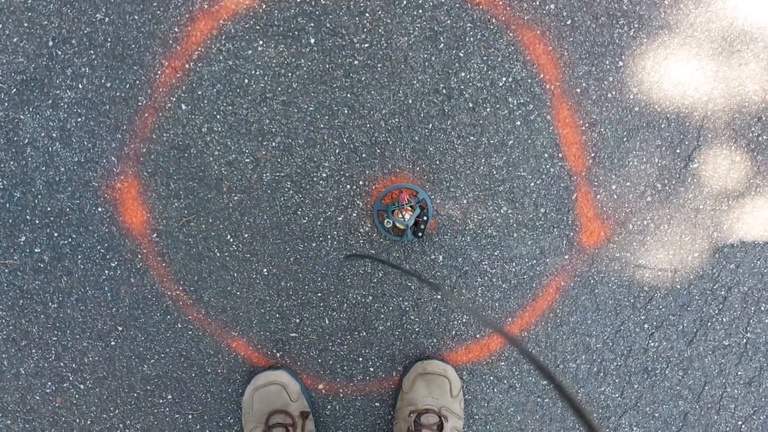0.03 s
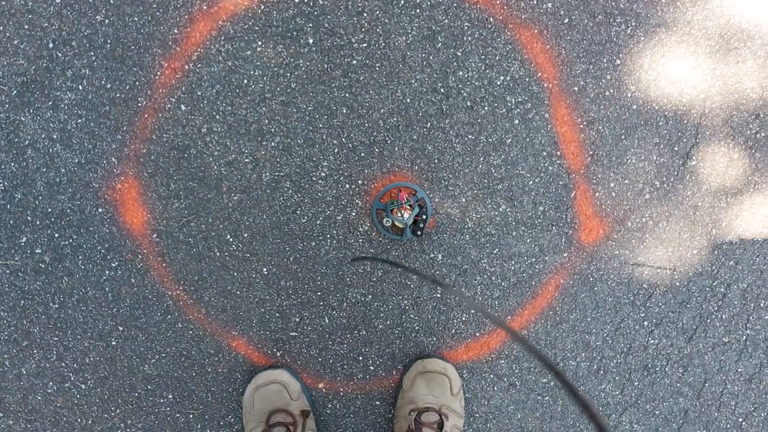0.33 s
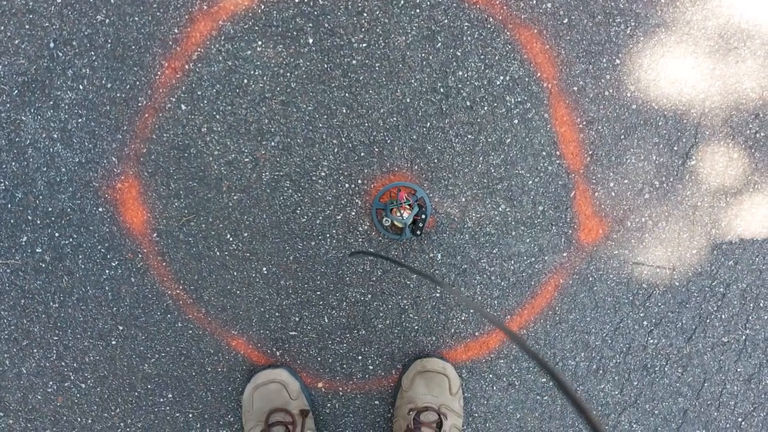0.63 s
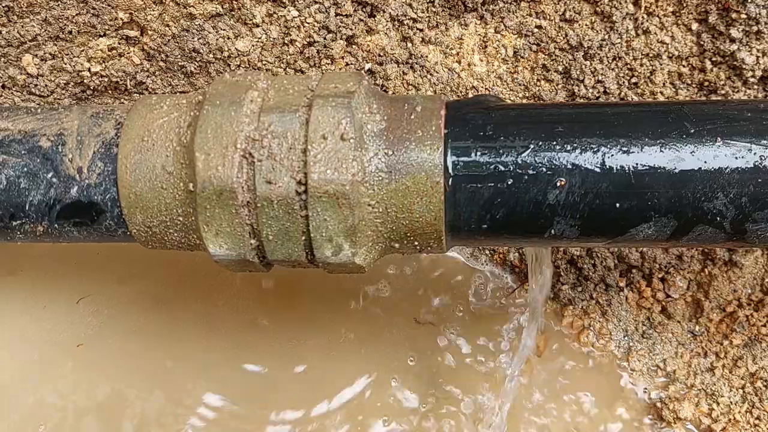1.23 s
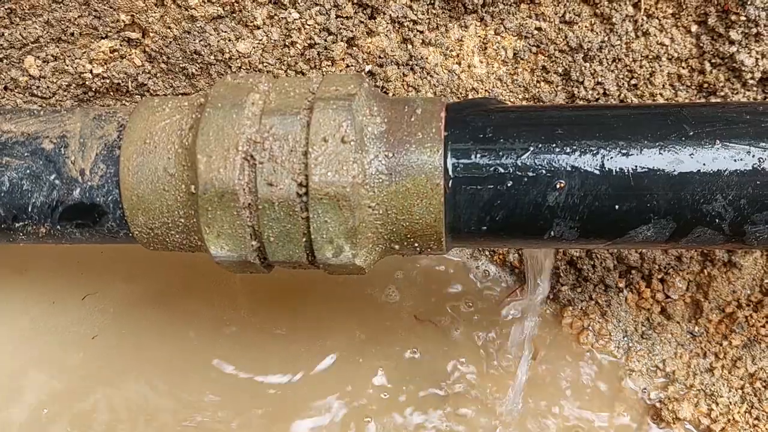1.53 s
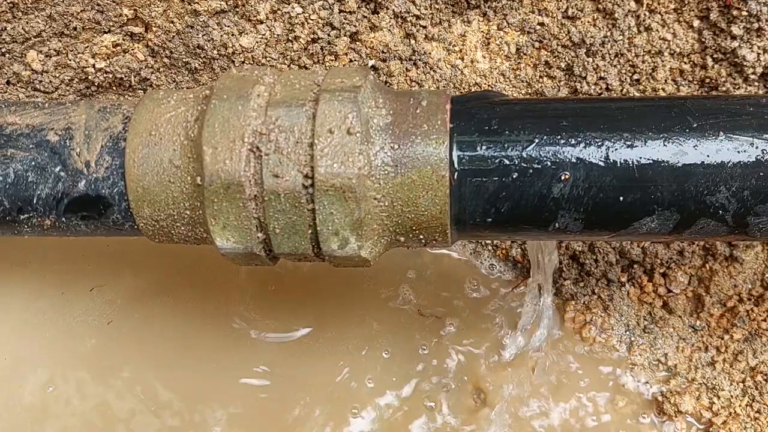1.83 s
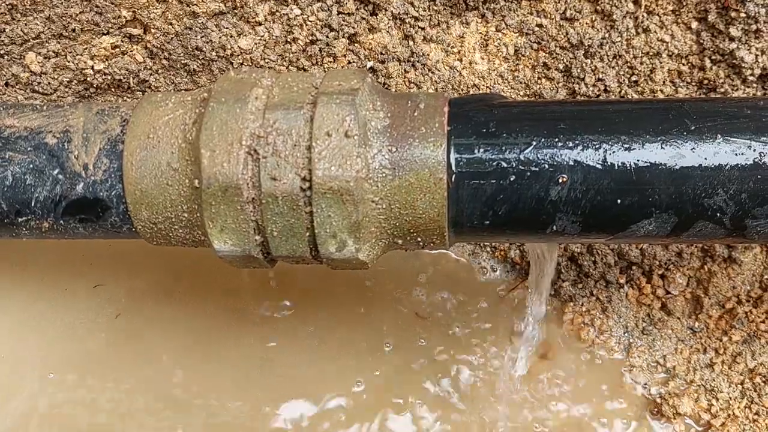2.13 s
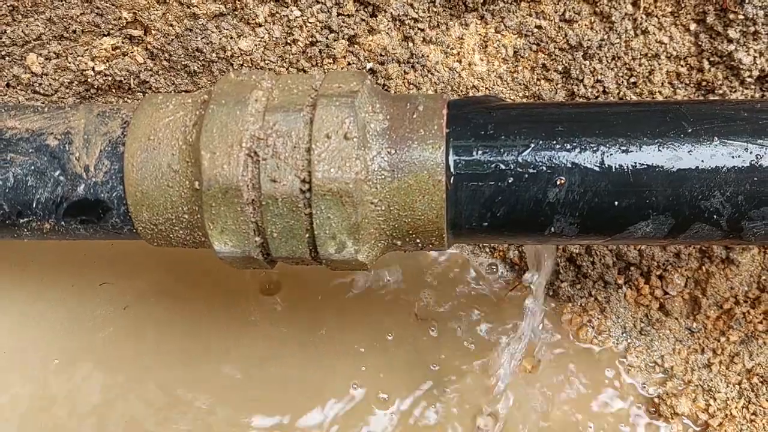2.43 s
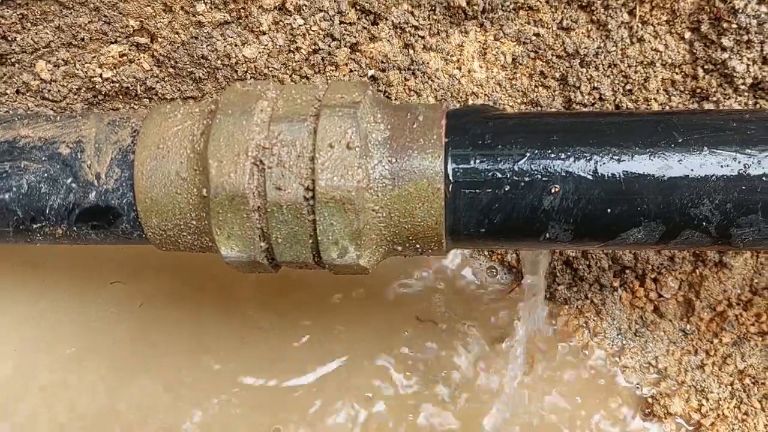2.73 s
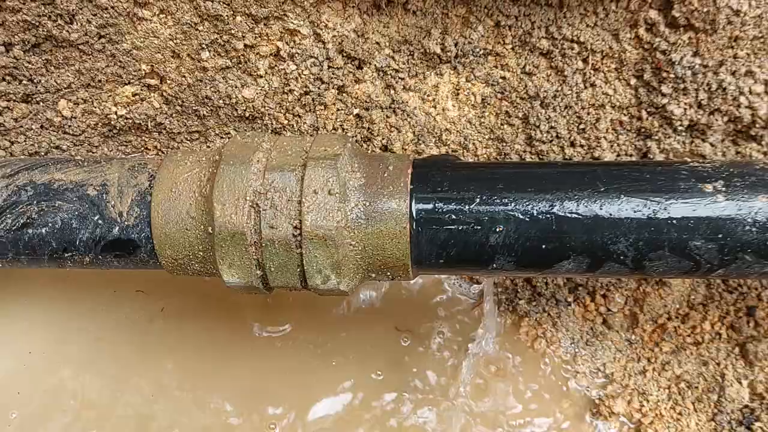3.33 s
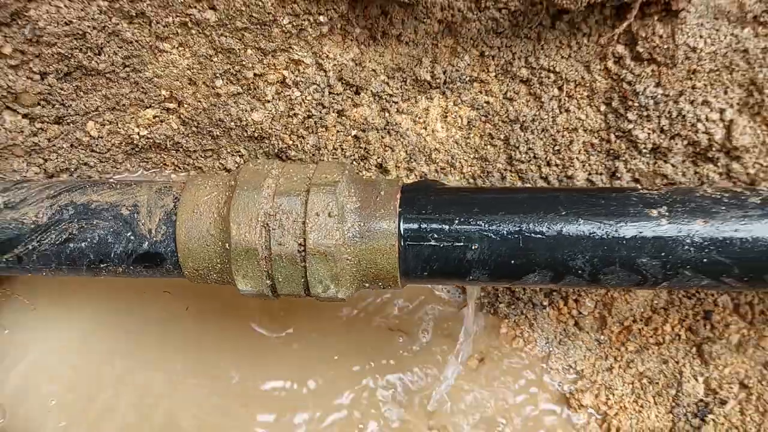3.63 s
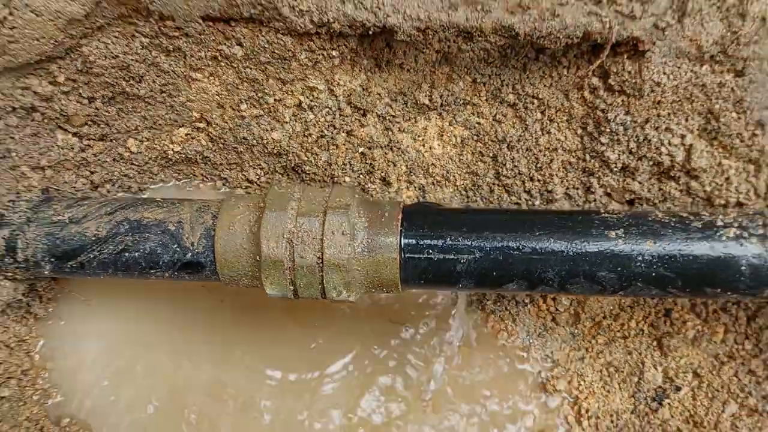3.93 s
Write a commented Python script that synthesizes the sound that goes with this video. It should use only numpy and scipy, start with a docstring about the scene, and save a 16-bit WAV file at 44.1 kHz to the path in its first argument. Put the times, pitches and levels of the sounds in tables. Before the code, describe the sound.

A hollow rush through the ground stops, then leaking water trickles into a puddle.

```python
"""First, a ground microphone on asphalt picks up a buried leak: a hollow rush, ringing near 600 Hz.
Two soft bumps push the sensor, and at 1.2 s the sound stops abruptly.
After a blink of silence, a thin stream falls from a pipe fitting into a muddy pit, close up.
Fine spray fizzes and makes the pit ring, small bubbles swarm, and a faint rumble lies underneath.
Over this, to the end, droplets tick on wet surfaces, tiny bubbles pip and large trapped bubbles plop."""
import sys
import numpy as np
from scipy import signal
from scipy.io import wavfile
from scipy.ndimage import uniform_filter1d

SR = 44100
rng = np.random.default_rng(int(sys.argv[2]) if len(sys.argv) > 2 else 0)


def digitize_waveform(pressure):
    """Quantize a signal to 16-bit integers and store it at the path in sys.argv[1].

    Rows of a 2-D input are taken as channels; values are limited to [-1, 1].
    """
    field = np.atleast_2d(pressure).T
    bounded = np.clip(field, -1, 1)
    quanta = np.round(bounded * 32767).astype(np.int16)
    wavfile.write(sys.argv[1], SR, quanta)


N = 176400
TIME = np.arange(N) / SR
BRIEF = TIME[:3500]  # the clock for one short sound, about 0.08 s
GROUND_END_S, PIT_START_S, CUTOFF_HZ = 1.203, 1.233, 16000


def from_db(db):
    """Turn decibels into a number to multiply a sound by."""
    return 10 ** (np.asarray(db) / 20)


def rms_one(x):
    """Scale a sound so that its average strength (rms) is 1."""
    return x / np.sqrt(np.mean(x ** 2) + 1e-20)


def butter(x, hz, kind, order=2):
    """Keep the lows, the highs or one band of a sound."""
    sections = signal.butter(order, np.minimum(hz, SR / 2 - 10), kind, fs=SR, output="sos")
    return signal.sosfilt(sections, x)


def add(out, s, sound):
    """Mix a short sound in at s seconds."""
    i = int(np.clip(s * SR, 0, N - 1))
    out[i:i + len(sound)] += sound[:N - i]


def delayed(x, s):
    """The same sound, s seconds later."""
    return np.interp(TIME[:len(x)] - s, TIME[:len(x)], x, left=0)


def fade(ring_s):
    """A fade that falls 60 dB in ring_s seconds."""
    return from_db(-60 * BRIEF / ring_s)


def drift(hz):
    """A random wander of about 1 either way; more hz makes it quicker."""
    slow = butter(rng.standard_normal(N // 20 + 4000), hz * 20, "low")[4000:]
    return np.interp(np.arange(N) / 20, np.arange(len(slow)), rms_one(slow))


def shaped_noise(spectrum, flicker_db, count=4):
    """Noise built from narrow bands that can flicker, partly together."""
    hz, db = np.transpose(spectrum)
    edges = 20 * 2 ** (np.arange(31) / 3)  # three bands per octave
    white = rng.standard_normal((2, N + SR // 2))
    together = drift(hz=47.3)
    flickers = [from_db(flicker_db * (together + drift(hz=45.3)) / np.sqrt(2)) for _ in range(count)]
    out = np.zeros(N)
    for k, (low, high) in enumerate(zip(edges, edges[1:])):
        gain = from_db(np.interp(np.log(low * high) / 2, np.log(hz), db))
        band = butter(white[k % 2], [low, high], "band", order=3)[-N:]
        out += gain * flickers[k % count] * band
    return rms_one(out)


def rung_noise(tones):
    """Churning noise that rings around a few pitches."""
    out = np.zeros(N)
    for hz, width, db in tones:
        band = butter(rng.standard_normal(N + SR), [hz - width / 2, hz + width / 2], "band")[-N:]
        out += from_db(db) * rms_one(band)
    return out


def burst(band_hz):
    """A short puff of noise between two frequencies."""
    return rms_one(butter(rng.standard_normal(len(BRIEF)), band_hz, "band"))


def bubble(hz, ring_s, rise_per_s, attack_s=0.00033):
    """A bubble rings and fades, its pitch rising as it nears the surface."""
    pitch = np.minimum(hz * (1 + rise_per_s * BRIEF), SR / 2)
    onset = 1 - np.exp(-BRIEF / attack_s)
    return onset * fade(ring_s) * np.sin(2 * np.pi * np.cumsum(pitch) / SR)


# Where the leak rings through the ground: (pitch [Hz], width [Hz], relative level [dB])
LEAK_TONES = [(606, 36.3, -37), (663.6, 75, -39.5), (772.6, 40, -48), (906, 170, -49)]
# Moments when the ringing noise happens to grow briefly louder: (time [s])
RINGING_SWELLS = [.097, 0.222, .283, 0.341, 0.466, .795, 0.976, 1.09, 1.189]
# The broad rush under the ringing: (frequency [Hz], relative level [dB])
LEAK_RUSH = [(60, -1), (200, -13.5), (1100, -21.5), (1700, -27.5), (2700, -27.5), (3600, -33.5),
             (5200, -36), (8200, -32.5), (12000, -39.5), (16000, -41.5)]


def ground_leak():
    """The ground carries the leak's steady rush; its ringing noise is briefly louder now and then."""
    ringing = rung_noise(LEAK_TONES)
    even = ringing / np.sqrt(uniform_filter1d(ringing ** 2, int(0.055 * SR)))
    swells = sum(np.exp(-((TIME - s) / 0.011) ** 2) for s in RINGING_SWELLS)
    rush = from_db(-37) * shaped_noise(LEAK_RUSH, flicker_db=0)
    sensor_offset = 0.11  # shifts the whole wave off zero
    return even * from_db(-35 + 5 * swells) + rush + sensor_offset


# Bumps on the ground microphone: (time [s], length [s], push level [dB])
SENSOR_BUMPS = [(0.277, 0.0236, -13), (1.029, 0.0234, -12.5)]


def bumps():
    """Each bump pushes the sensor over and lets it go: a dull, sagging pulse."""
    push = sum(from_db(db) * ((TIME > s) & (TIME < s + length)) for s, length, db in SENSOR_BUMPS)
    sagging = butter(push, 8.5, "high", order=1)
    return butter(sagging, 156, "low")


# The tone of the fine spray: (frequency [Hz], relative level [dB])
FIZZ_SHAPE = [(400, -8), (600, -27), (900, -5.5), (2600, 1.5), (3100, -6.5), (3650, -4.5), (5200, 2.5),
              (7300, 3), (8400, -11.5), (9700, -3.5), (12200, -2.5), (16000, -4.5)]
# How loud the spray is: (time [s], level [dB])
FIZZ_LOUDNESS = [(1.6, -48.5), (3.1, -49), (3.6, -51)]


def spray_fizz():
    """Fine spray makes a flickering hiss."""
    level_db = np.interp(TIME, *np.transpose(FIZZ_LOUDNESS))
    return from_db(level_db) * shaped_noise(FIZZ_SHAPE, flicker_db=3.5)


# Where the pit rings: (pitch [Hz], width [Hz], level [dB])
PIT_TONES = [(2560, 810, -63.5), (4000, 120, -66.5), (4400, 230, -61.5), (6020, 1000, -62),
             (7110, 630, -60), (8560, 440, -62)]


def pit_ringing():
    """The spray keeps the hollow of the pit ringing faintly."""
    return rung_noise(PIT_TONES)


def pit_echo(x, slap_s=0.00202):
    """Add one slap from the water surface or pipe close by, then a faint, very short tail."""
    tail = rng.standard_normal(len(BRIEF)) * fade(ring_s=0.041) * (BRIEF > slap_s)
    echoes = signal.fftconvolve(x, tail / np.linalg.norm(tail))[:N]
    return x + from_db(-27) * delayed(x, slap_s) + from_db(-8.5) * echoes


# Swarms of faint bubbles: (rate [per s], lowest pitch [Hz], highest pitch [Hz],
# ring length [cycles], lowest level [dB], typical extra level [dB])
BUBBLE_SWARMS = [(75, 1157, 3270, 28, -46, 2.5), (219.4, 3720, 9650, 23, -47.5, 4.5),
                 (108.7, 4200, 31000, 9.5, -40.5, 4.5)]
SMALL_RISE_PER_S = 26  # small bubbles glide up fast: share of their pitch per second


def swarms():
    """Small bubbles burst at random, mostly faint, now and then stronger."""
    out = np.zeros(N)
    for per_s, low_hz, high_hz, cycles, db, extra_db in BUBBLE_SWARMS:
        draws = rng.random((3000, 4))
        gaps_s = -np.log(draws[:, 0]) / per_s
        starts = PIT_START_S + np.cumsum(gaps_s)
        for s, (_, pitch, size, rise) in zip(starts[starts < N / SR], draws):
            hz = low_hz * (high_hz / low_hz) ** pitch
            strength = from_db(db + extra_db * min(-np.log(size), 4))
            ring = bubble(hz, cycles / hz, 2 * rise * SMALL_RISE_PER_S, attack_s=0.5 / hz)
            add(out, s, strength * ring)
    return out


# The tone of the distant rumble: (frequency [Hz], relative level [dB])
RUMBLE_SHAPE = [(45, -15.5), (65, 4), (90, -9), (140, -15), (200, -30), (300, -17), (400, -31.5),
                (700, -26.5), (2000, -87)]
# Its low drone: (pitch [Hz], width [Hz], base level [dB])
DRONE_TONES = [(61.95, 5.8, -59.5)]
# How the drone swells and sinks: (time [s], level change [dB])
DRONE_CHANGES = [(1.3, -6), (1.68, 13), (1.82, -7), (2.0, 18), (2.1, 3), (2.53, 11.5), (3.2, -26),
                 (3.92, 12.5)]


def distant_rumble():
    """A faint, flickering rumble with a low drone that comes and goes."""
    rumble = from_db(-54.5) * shaped_noise(RUMBLE_SHAPE, flicker_db=3)
    swell_db = np.interp(TIME, *np.transpose(DRONE_CHANGES))
    return rumble + from_db(swell_db) * rung_noise(DRONE_TONES)


# Droplets landing: (time [s], relative level [dB])
DROPLET_TICKS = [(1.257, -26), (1.5212, -29), (2.366, -34), (3.392, -34), (1.4897, -31), (1.5315, -26),
                 (1.8061, -28.5), (1.9256, -26), (2.1633, -29.5), (2.187, -29), (2.2821, -19), (2.381, -37),
                 (2.544, -31), (2.7798, -26.5), (3.2016, -26.5), (3.3146, -27.5), (3.591, -28),
                 (3.7409, -23.5)]


def ticks():
    """Droplets smack on wet surfaces, each a bright snap of noise."""
    out = np.zeros(N)
    for s, db in DROPLET_TICKS:
        smack = burst([5300, 7300])
        crack = from_db(4) * burst([5300, CUTOFF_HZ])
        add(out, s, from_db(db - 9.5) * (smack + crack) * fade(ring_s=0.011))
    return out


def splash(low_hz, high_hz, fade_s):
    """A quickly fading spit of spray that goes with a bubble."""
    return burst([low_hz, high_hz]) * np.exp(-BRIEF / fade_s)


# Tiny bubbles from single drops: (time [s], relative level [dB], pitch [Hz])
TINY_BUBBLES = [(1.2573, -29, 5270), (1.558, -28.5, 5130), (1.739, -22.5, 4600), (1.8641, -23, 4580),
                (2.002, -27, 4430.0), (2.104, -23.5, 4200), (2.18, -27, 6700), (2.553, -29, 7460),
                (2.6408, -24, 4030), (2.8363, -25, 4820), (2.963, -24.5, 4660), (3.1984, -21.5, 5060),
                (3.2417, -25.5, 4440), (3.294, -23, 4030), (3.3938, -25.5, 5430), (3.7415, -23, 4370),
                (3.7762, -24.5, 5140)]


def pips():
    """A single drop makes a tiny, high-pitched bubble and a little spray."""
    out = np.zeros(N)
    for s, db, hz in TINY_BUBBLES:
        ring = bubble(hz, ring_s=0.011, rise_per_s=10)
        spray = from_db(-16.5) * splash(0.23 * hz, 1.64 * hz, fade_s=0.0045)
        add(out, s, from_db(db - 0.5) * (ring + spray))
    return out


# Large bubbles: (time [s], relative level [dB], pitch [Hz], time to fade by 60 dB [s])
LARGE_BUBBLES = [(1.3353,-27,1550,0.011), (1.362,-22,1460,0.022), (1.363,-32,1990,0.035),
                 (1.378,-33.5,655,0.014), (1.3805,-32.5,365,0.01), (1.4024,-27.5,980,0.0069),
                 (1.427,-28.5,840,0.0096), (1.4902,-26.5,2670,0.013), (1.499,-23,1110,0.0092),
                 (1.5653,-26,1850,0.024), (1.588,-34.5,917,0.03), (1.727,-38.5,957,0.052),
                 (1.739,-33,1900,0.034), (1.865,-29.5,1930,0.026), (1.917,-33.5,2460,0.04),
                 (1.925,-38,1464,0.033), (2.0002,-35,2480,0.04), (2.0965,-35.5,646,0.077),
                 (2.11,-31,1640,0.024), (2.1513,-32,2530,0.038), (2.325,-30.5,2860,0.013),
                 (2.369,-34,1970,0.029), (2.381,-19.5,1420,0.016), (2.4167,-33,1078,0.052),
                 (2.519,-26,2770,0.0073), (2.592,-26,907,0.019), (2.598,-33.5,1307,0.042),
                 (2.6168,-28,2780,0.013), (2.637,-34.5,1268,0.039), (2.686,-30,1755,0.031),
                 (2.7227,-35.5,994,0.025), (2.8141,-30,2480,0.039), (2.853,-41,1080,0.039),
                 (2.998,-23.5,1338,0.015), (3.0503,-26.5,804,0.017), (3.073,-33,734,0.039),
                 (3.0974,-24,1370,0.0055), (3.1192,-27,1040,0.025), (3.1527,-25,1930,0.011),
                 (3.213,-30.5,1310,0.0091), (3.43,-42.5,750,0.039), (3.5923,-31,2200,0.05),
                 (3.7031,-29,900,0.01), (3.802,-32.5,1460,0.017), (3.8166,-30.5,1565,0.03),
                 (3.838,-38,1550,0.035), (3.87,-22.5,1670,0.0085), (3.929,-33,1160,0.024),
                 (3.948,-34.5,1460,0.043)]


def plops(splits=5, split_within_s=0.02):
    """The stream traps a large bubble with a splash, and small bubbles break off just after."""
    out = np.zeros(N)
    for s, db, hz, ring_s in LARGE_BUBBLES:
        fastest_rise = 17.8 * min(hz / 1210, 1) ** 2  # bubbles below 1210 Hz glide less
        plop = bubble(hz, ring_s, fastest_rise * rng.random())
        plop += from_db(-21.5) * splash(0.85 * hz, 2.8 * hz, fade_s=0.0074)
        for k, (when, pitch) in enumerate(rng.random((splits, 2))):
            small_hz = hz * 1.05 * (2.18 / 1.05) ** pitch  # 1.05 to 2.18 times as high
            small = bubble(small_hz, ring_s=0.013, rise_per_s=SMALL_RISE_PER_S)
            plop += from_db(-12.5) * delayed(small, split_within_s * (k + when) / splits)
        plop = butter(plop, 0.59 * hz, "high", order=4)  # a bubble gives off little far below its pitch
        add(out, s, from_db(db + 1) * plop)
    return out


def scene():
    """First the ground, then, after a short silence, the open pit."""
    fizz = spray_fizz()
    rumble = distant_rumble()
    water = plops() + pips() + ticks() + swarms() + fizz
    pit = pit_echo(water) + pit_ringing() + rumble
    ground = ground_leak() + bumps()
    return (ground * (TIME < GROUND_END_S) + pit * (TIME > PIT_START_S))[None]


def record(dry):
    """Cut off the very highest treble steeply."""
    return signal.sosfilt(signal.ellip(10, .1, 80, CUTOFF_HZ, fs=SR, output="sos"), dry)


dry = scene()
out = record(dry)
digitize_waveform(out)
```